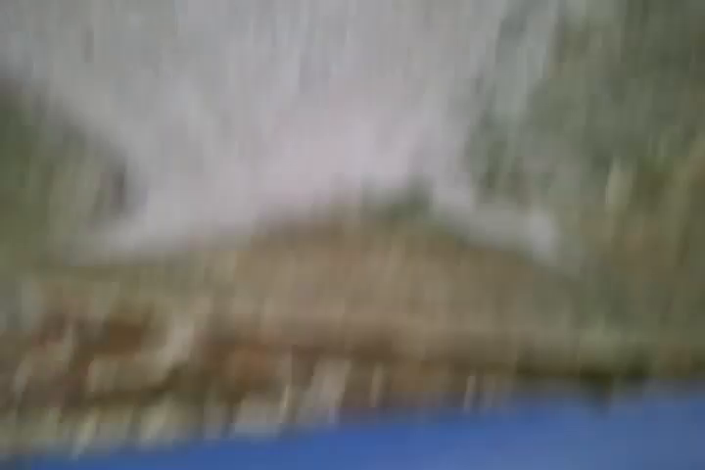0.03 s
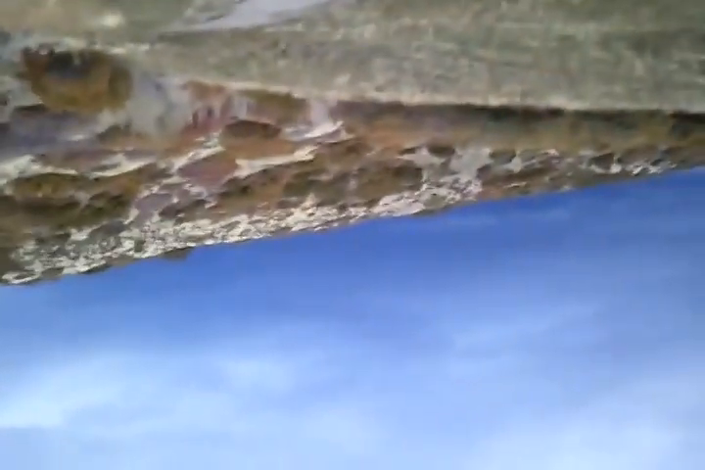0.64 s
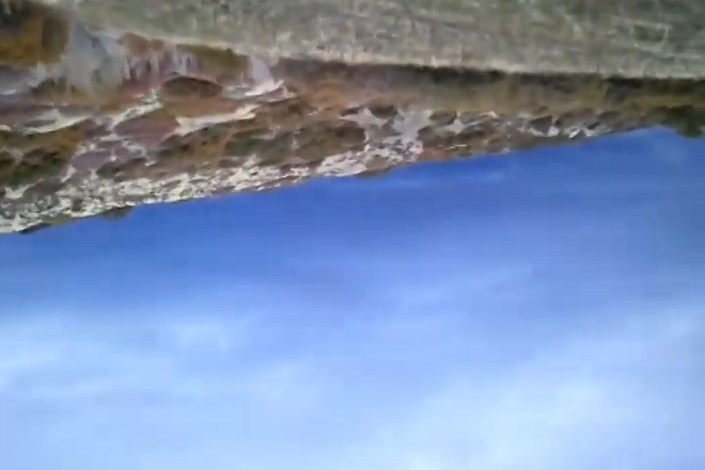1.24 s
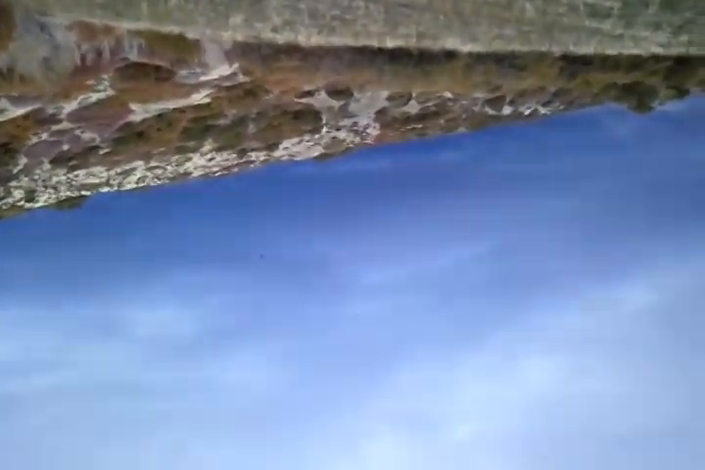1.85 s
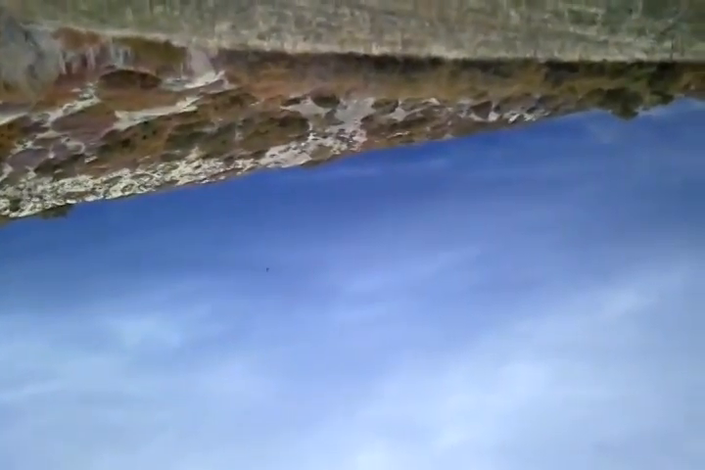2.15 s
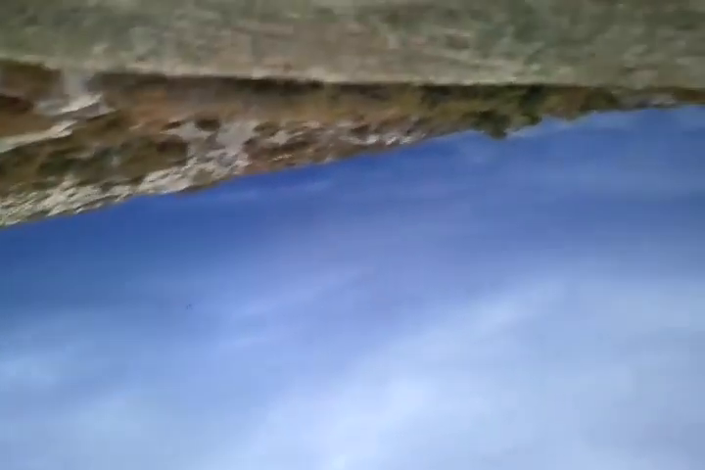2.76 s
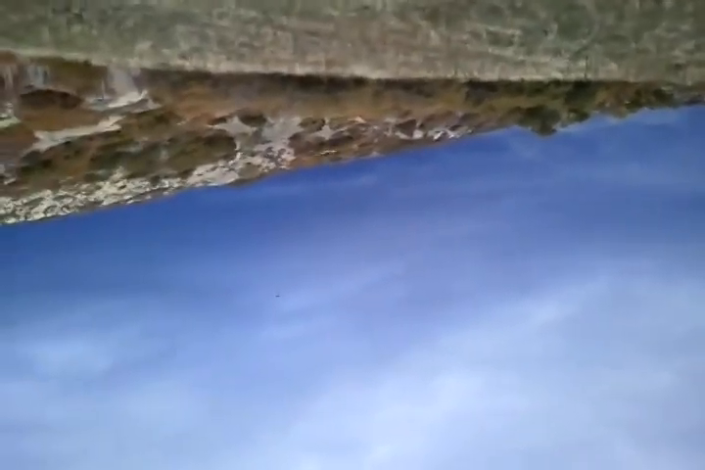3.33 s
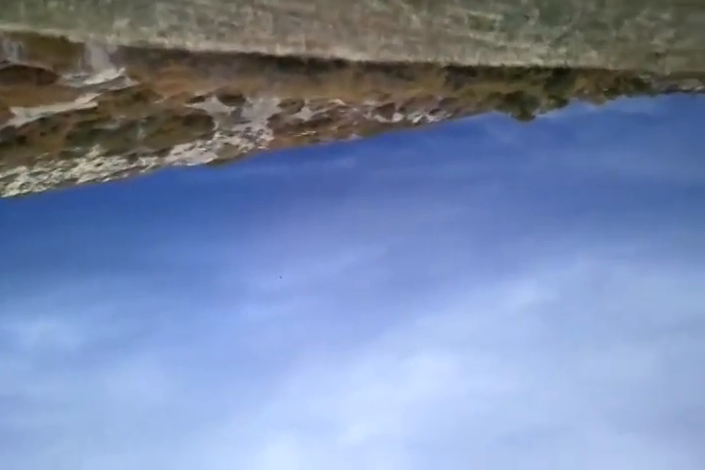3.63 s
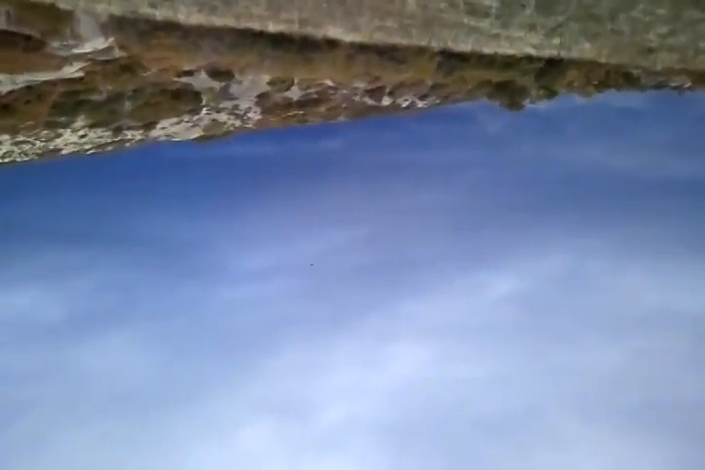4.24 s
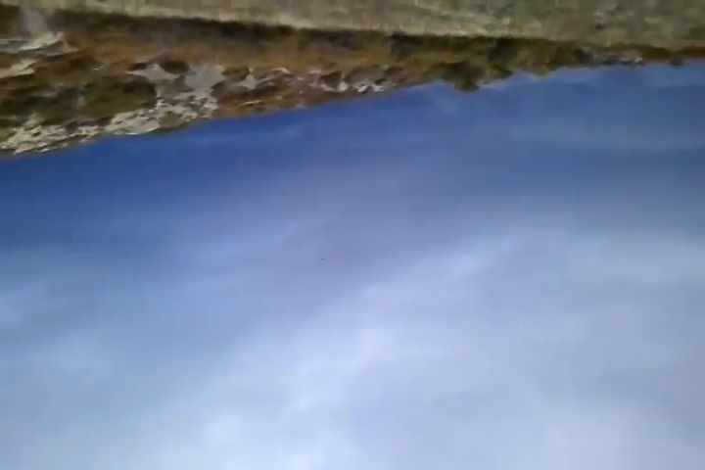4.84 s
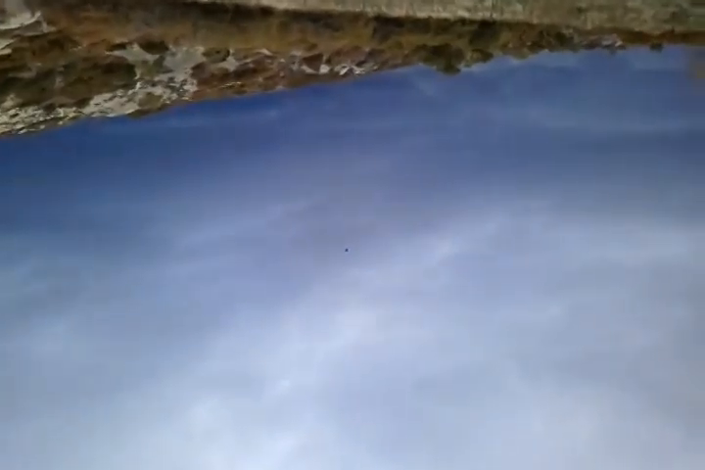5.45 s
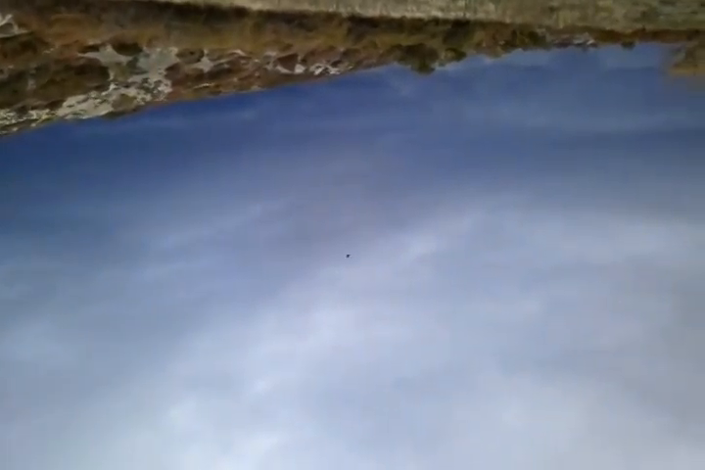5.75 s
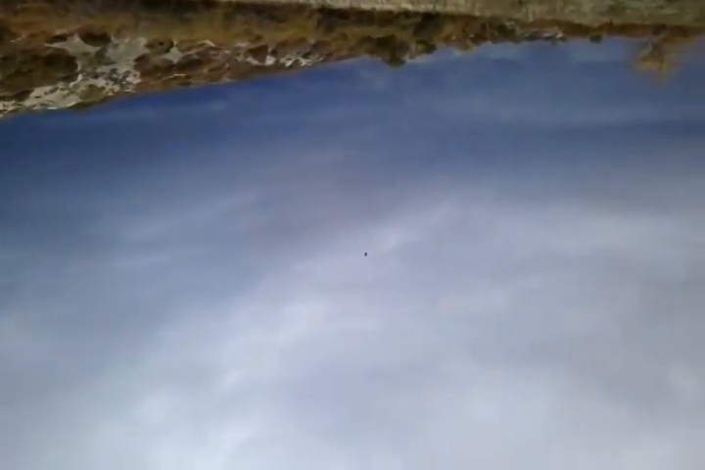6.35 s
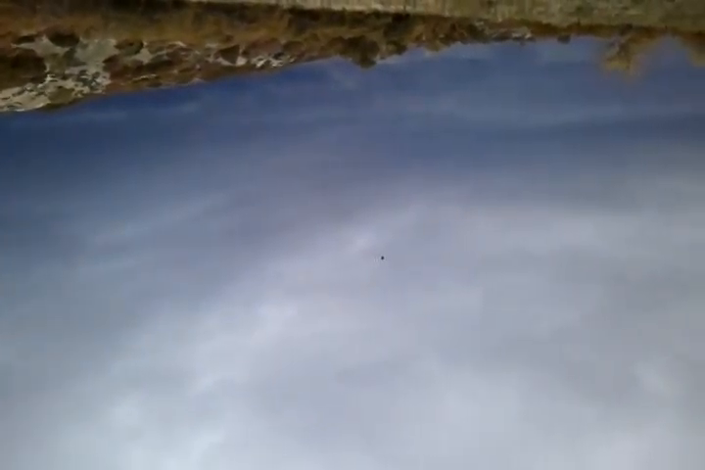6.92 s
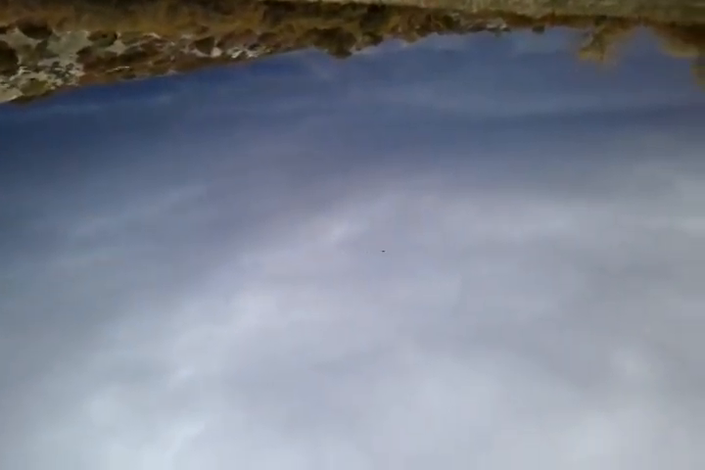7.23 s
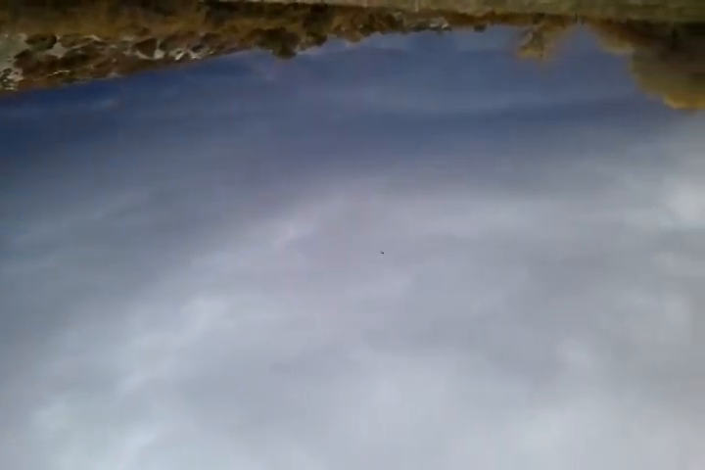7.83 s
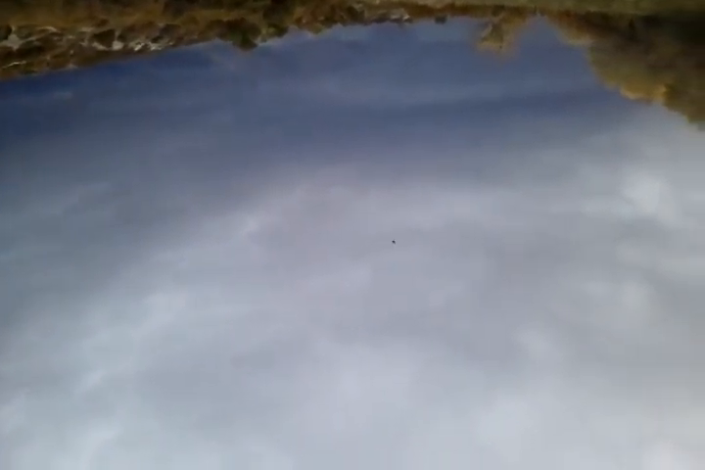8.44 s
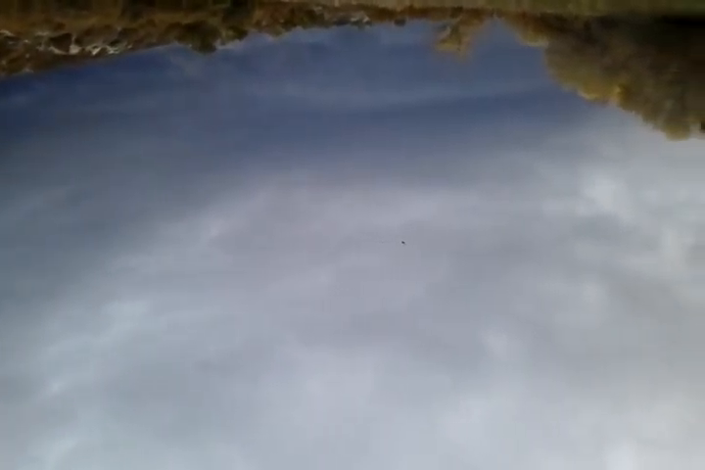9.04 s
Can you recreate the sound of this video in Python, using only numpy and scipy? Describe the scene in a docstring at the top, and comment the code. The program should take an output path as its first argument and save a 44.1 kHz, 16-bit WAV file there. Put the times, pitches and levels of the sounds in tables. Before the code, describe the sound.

After a brief silence, a soft hillside breeze comes in at about 0.7 seconds and continues throughout. Cloth and dry grass rustle close to the hand-held microphone, with small crunches and snaps. Two faint, hoarse bird cries carry from far off at about 1.6 and 3.1 seconds. The crunching peaks around 3 seconds with the loudest, sharpest snaps and two tiny metal clinks, the second much weaker. From about 3.6 to 5 seconds fingers bump the camera case and shift their grip with dull knocks and crackle. The rustle dies away by 6 seconds, leaving the breeze. At 6.8 seconds a hawk screams once, high overhead: a harsh rising attack, then a long, wavering, sinking whistle that cracks into rasp. It fades by about 8.5 seconds with a thin echo from the slopes.

```python
"""A breeze blows over a hillside. Cloth and dry grass rustle, crunch and snap close to a hand-held camera.
Two faint cries carry from far off; between them a small metal fitting clinks twice.
Fingers bump the case and shift their grip, then the rustle dies away.
At 6.8 s a hawk screams once, high overhead: a harsh rising attack, then a long wavering, sinking
whistle, cracking into rasp where its syrinx vibrates chaotically. The slopes scatter a thin tail."""
import sys
import numpy as np
from scipy import signal
from scipy.fft import rfft, irfft, next_fast_len
from scipy.io import wavfile
from scipy.ndimage import map_coordinates

SR = 44100
rng = np.random.default_rng(int(sys.argv[2]) if len(sys.argv) > 2 else 0)


def pcm_store(signal):
    """Save signal as 16-bit PCM."""
    levels = np.round(np.clip(np.atleast_2d(signal), -1, 1) * 32767)
    wavfile.write(sys.argv[1], SR, levels.astype(np.int16).T)


N = 404838

# wind spectrum: f/Hz, density/dB
WIND_SPECTRUM = [(18, -39), (30, -14.5), (75, -8.5), (108, -8.5), (181, -4), (240, -1.5), (704, -2.5),
                 (910, -2.5), (1070, -4.5), (1390, -6), (2370, -11.5), (2860, -11.5), (3610, -13.5),
                 (7460, -13), (8000, -17.5), (10400, -64), (17600, -120)]
# distant cries: start/s, length/s, level/dB
DISTANT_CRIES = [(1.562, 0.38, -57.5), (3.131, 0.39, -60)]
# cloth and grass rubbing: t/s, level/dB
RUB_LEVEL = [(0.91, -54), (1.4, -52), (1.7, -47.5), (2.2, -54.5), (2.3, -50), (2.5, -47.5), (2.76, -37.5),
             (2.85, -45), (3.0, -45), (3.15, -42), (3.45, -48.5), (3.64, -58), (3.83, -45), (4.25, -50.5),
             (4.9, -50), (5.35, -60), (5.75, -57.5), (6.2, -66)]
# rubbing spectrum: f/Hz, density/dB
RUB_SPECTRUM = [(24, -44), (40, -30.5), (142, -7), (189, -15.5), (479, 1.5), (714, -4.5), (1160, -3),
                (1660, -2), (1980, -3.5), (2160, -2.5), (5250, -1), (7000, 6), (8000, 3.5), (10400, -81.5),
                (17600, -120)]
# crunching scrapes: crest t/s, level/dB, decay/s
SCRAPE_EVENTS = [(0.758, -36, 0.0048), (1.175, -41.5, .014), (1.423, -39, 0.0088), (2.349, -36, .014),
                 (2.703, -30.5, 0.066), (2.878, -27.5, 0.016), (2.918, -30.5, 0.014), (2.936, -19.5, 0.005),
                 (2.951, -23.5, 0.021), (3.007, -22.5, 0.003), (3.035, -23.5, 0.0026), (3.657, -37, .005),
                 (3.674, -33.5, .014), (3.718, -37.5, 0.0066), (3.797, -41, .0075), (3.846, -32.5, 0.023),
                 (4.539, -42, 0.03), (4.707, -39.5, 0.0072), (4.981, -39.5, 0.0056), (5.014, -42, .005)]
# scrape spectrum: f/Hz, density/dB
SCRAPE_SPECTRUM = [(30, -10), (300, -11), (1500, -9.5), (3000, -8), (5000, -3), (7500, 5), (8500, -9),
                   (10000, -38.5)]
# dry snaps: t/s, level/dB, centre f/Hz
SNAP_EVENTS = [(1.4214, -24.5, 5000), (1.469, -23.5, 2700), (1.784, -28.5, 6000), (2.016, -28, 6500),
               (2.241, -40, 5500), (2.735, -22, 6000), (2.862, -23, 5500), (2.9505, -12, 6500),
               (3.0247, -4.5, 4300), (3.0342, -14, 6500), (3.7966, -20.5, 6000), (3.804, -22, 5600),
               (4.146, -32, 6500), (4.463, -24, 5500), (5.016, -29, 6500)]
# fingers shifting grip: t/s, level/dB
GRIP_LEVEL = [(3.6, -63), (3.66, -46.5), (3.9, -46), (4.1, -54.5), (4.5, -54), (4.8, -55), (5.15, -59),
              (5.3, -77)]
# finger bumps on the case: t/s, level/dB, f/Hz
BUMP_EVENTS = [(1.222, -35, 996), (1.421, -32.5, 956), (3.108, -31, 646), (3.207, -31, 1400),
               (3.642, -28, 495), (3.654, -22, 514), (3.666, -14, 785), (3.675, -24, 980),
               (3.682, -27, 410), (3.691, -24, 430), (3.714, -29, 1040), (3.78, -34.5, 960),
               (3.836, -25.5, 690), (3.894, -28.5, 1140), (4.033, -22, 880), (4.41, -30.5, 1440),
               (4.44, -33.5, 1340), (4.461, -33.5, 1570), (4.533, -33, 1250), (4.713, -28.5, 610),
               (5.102, -34.5, 940)]
# touches of the metal fitting: t/s, level/dB
CLINK_EVENTS = [(2.954, -29), (3.031, -45)]
# modes of the fitting: f/Hz, level/dB, t60/s
METAL_MODES = [(1370, 2.5, 0.085), (4720, -5, 0.14), (6170, -2, 0.061), (6280, 0, 0.18), (6550, -7, .14),
               (7660, 2, 0.11), (8400, -4, .14)]
# scream contour: t/s, f/Hz, level/dB, roughness
SCREAM = [(6.775, 2340, -53, 0.66), (6.818, 2630, -36.5, 0.64), (6.85, 3040, -35.5, 0.35),
          (6.895, 3105, -35, 0), (6.91, 3300, -40.5, 1.1), (6.975, 2697, -44, 0.74),
          (7.09, 2520, -43, 0.38), (7.21, 2449, -46, 0.43), (7.38, 2513, -46, 0.4), (7.47, 2360, -48, .4),
          (7.6, 2370, -43.5, .17), (7.7, 2316, -48.5, 0.37), (7.84, 2340, -48, 0.43),
          (7.915, 2340, -44.5, 0.02), (7.99, 2198, -52.5, .36), (8.27, 2140, -52.5, .3),
          (8.45, 2090, -70, 0.7)]
# cracks from whistle into rasp: centre t/s, half-length/s, loss/dB
VOICE_CRACKS = [(7.143, 0.036, 2.5), (7.293, .012, 2), (7.411, .014, 3.5), (7.521, 0.017, 5),
                (7.75, 0.039, 2.5), (7.955, 0.027, 5), (8.088, .024, 8), (8.205, .028, 9), (8.31, .02, 8)]
# period doubling of the syrinx: start/s, end/s, half-pitch level/dB re main line
PERIOD_DOUBLINGS = [(7.03, 7.13, -12), (7.194, 7.423, -11), (7.976, 8.084, -6.5)]
# throat rasp, beak wide: f/Hz, density/dB
RASP_OPEN = [(1500, -35), (2300, -20), (2800, 0.5), (3500, 0.5), (4100, -3.5), (4700, -8), (5300, -5),
             (6200, -19), (7000, -5.5), (8000, -19)]
# throat rasp, beak nearly closed: f/Hz, density/dB
RASP_CLOSED = [(1000, -29.5), (1700, 1), (2000, -4.5), (2900, 7.5), (3600, -4), (4300, -9), (5300, -12),
               (6000, -13), (8000, -25)]


def amp(db):
    return 10 ** (np.asarray(db) / 20)


def unit_rms(x):
    return x / np.sqrt(np.mean(x ** 2) + 1e-20)


def clock():
    return np.arange(N) / SR


def curves(rows):
    """Each column after t, interpolated per sample."""
    times, *columns = np.transpose(rows)
    return [np.interp(clock(), times, column) for column in columns]


def during(rows, fade_s):
    """Gate over a table's time span."""
    return np.clip(np.minimum(clock() - rows[0][0], rows[-1][0] - clock()) / fade_s, 0, 1)


def plateau(centre_s, half_s):
    """Flat-topped window, soft shoulders."""
    return 1 / (1 + ((clock() - centre_s) / half_s) ** 6)


def wobble(rate_hz):
    """Smooth random curve, knots at rate_hz."""
    knots = rng.standard_normal(int(N * rate_hz / SR) + 4)
    return map_coordinates(knots, [np.arange(N) * rate_hz / SR])


def fuzz(phase, rate_hz):
    """Noise band around a carrier, rms 1."""
    return unit_rms(wobble(rate_hz) * np.sin(phase) + wobble(rate_hz) * np.cos(phase))


def filtered(x, response):
    size = next_fast_len(N + SR // 2)
    return irfft(rfft(x, size) * response(np.fft.rfftfreq(size, 1 / SR)), size)[:N]


def coloured(x, spectrum):
    """x shaped by a spectrum table, rms 1."""
    knots_hz, db = np.transpose(spectrum)
    return unit_rms(filtered(x, lambda hz: amp(np.interp(np.log(hz + 1), np.log(knots_hz + 1), db))))


def resonant(x, hz, q):
    return signal.lfilter(*signal.iirpeak(hz, q, SR), x)


def resonant_twice(x, hz, q):
    return resonant(resonant(x, hz, q), hz, q)


def noise_band(hz, q, samples=N):
    return unit_rms(resonant_twice(rng.standard_normal(samples), hz, q))


def highpass(x, hz):
    return signal.sosfilt(signal.butter(2, hz, "high", fs=SR, output="sos"), x)


def add(track, start_s, sound):
    part = track[round(start_s * SR):][:len(sound)]
    part += sound[:len(part)]


def grains(rate_hz, spread_db):
    """Tiny random slips, a few far stronger than the rest."""
    size = amp(spread_db * np.minimum(rng.exponential(size=N), 4))
    return unit_rms((rng.random(N) < rate_hz / SR) * size * rng.choice([-1, 1], N))


def hillside(x, t60_s=1.0, wet_db=-12):
    """Rocks and slopes scatter a thin tail."""
    t = np.arange(SR) / SR
    tail = rng.standard_normal(SR) * amp(-60 * t / t60_s) * (1 - np.exp(-t / .01))
    return x + amp(wet_db) * signal.fftconvolve(x, tail / np.linalg.norm(tail))[:N]


def wind(breeze_db=-53, gust_db=2.5, gust_s=3.25, gust_width_s=0.43, hum_db=-69):
    """Air rushes over the slope: one broad swell, faint low hum."""
    level_db = breeze_db + gust_db * np.exp(-((clock() - gust_s) / gust_width_s) ** 2)
    rush = amp(level_db + 0.5 * wobble(6.8)) * coloured(rng.standard_normal(N), WIND_SPECTRUM)
    hum = amp(hum_db) * noise_band(hz=84.7, q=3)
    pickup_db = np.interp(clock(), [.8, .95], [-4, 0])
    return (rush + hum) * amp(pickup_db)


def far_cries(top_hz=3400, scoop_hz=598, scoop_s=.06, jitter=0.025):
    """Distance leaves a hoarse, blurred whistle; each scoops up to pitch."""
    out = np.zeros(N)
    for start_s, length_s, db in DISTANT_CRIES:
        pitch_hz = top_hz - scoop_hz * np.exp(-np.maximum(clock() - start_s, 0) / scoop_s)
        phase = 2 * np.pi * np.cumsum(pitch_hz * (1 + jitter * wobble(500))) / SR
        out += amp(db) * plateau(start_s + length_s / 2, length_s / 2) * fuzz(phase, 450)
    return out


def rustle(grain_share=0.77):
    """Cloth and dry grass slide in dense fibre slips."""
    level_db, = curves(RUB_LEVEL)
    slips = np.sqrt(grain_share) * grains(rate_hz=4000, spread_db=4.75)
    slips += np.sqrt(1 - grain_share) * rng.standard_normal(N)
    return amp(level_db + 1.67 * wobble(60)) * during(RUB_LEVEL, 0.005) * coloured(slips, RUB_SPECTRUM)


def scrapes(rise_s=0.004):
    """Fibre slips thicken into short crunches."""
    t, pressure = clock(), np.zeros(N)
    for crest_s, db, decay_s in SCRAPE_EVENTS:
        falloff = np.maximum((crest_s - t) / rise_s, (t - crest_s) / decay_s)
        pressure += amp(db) * np.exp(-falloff.clip(0, 30))
    return pressure * coloured(grains(rate_hz=9000, spread_db=2.7), SCRAPE_SPECTRUM)


def snaps(t60_s=0.0087, splinter=0.33):
    """One sharp crack each, with a brief splintering tail."""
    out, t = np.zeros(N), np.arange(SR // 20) / SR
    for start_s, db, hz in SNAP_EVENTS:
        crack = splinter * rng.standard_normal(len(t)) * amp(-60 * t / t60_s)
        crack[0] = 1
        crack = resonant(crack, hz, q=0.76)
        add(out, start_s, amp(db) * crack / np.abs(crack).max())
    return highpass(out, hz=1100)


def grip(gain_db=-2, case_hz=1100):
    """Skin sticks and slips on the case: dull, irregular crackle."""
    level_db, = curves(GRIP_LEVEL)
    crackle = unit_rms(resonant_twice(grains(rate_hz=260, spread_db=4.4), case_hz, q=1))
    return amp(level_db + gain_db) * during(GRIP_LEVEL, .02) * crackle


def bumps(damping_db_per_s=120 / 0.0061, rattle_gain=0.26, rattle_t60_s=0.054, delay_s=0.001025):
    """Fingertips hit the case: damped pop, short rattle."""
    out, t = np.zeros(N), np.arange(SR // 12) / SR
    for start_s, db, hz in BUMP_EVENTS:
        pop = np.sin(2 * np.pi * hz * t) * t * amp(-damping_db_per_s * t)
        rattle = rattle_gain * noise_band(hz, q=1, samples=len(t)) * amp(-60 * t / rattle_t60_s)
        add(out, start_s + delay_s, amp(db) * (pop / np.abs(pop).max() + rattle))
    return highpass(out, hz=230)  # a small case radiates little bass


def clinks(spread_db=2):
    """The fitting's modes ring at new strengths on each touch."""
    out, t = np.zeros(N), np.arange(SR // 4) / SR
    for start_s, db in CLINK_EVENTS:
        for hz, mode_db, t60_s in METAL_MODES:
            level_db = db + mode_db + rng.normal(0, spread_db) - 60 * t / t60_s
            add(out, start_s, amp(level_db) * np.sin(2 * np.pi * hz * t))
    return out


def syrinx(waver_start_s=7.03, waver_hz=8.1, depth_hz=124.6, fade_s=0.59, crack_rough=0.9):
    """Pitch, effort and roughness of the scream: contour, dying waver, cracks."""
    pitch_hz, effort_db, rough = curves(SCREAM)
    age_s = np.maximum(clock() - waver_start_s, 0)
    pitch_hz -= depth_hz * np.exp(-age_s / fade_s) * np.sin(2 * np.pi * waver_hz * age_s)
    for centre_s, half_s, loss_db in VOICE_CRACKS:
        crack = plateau(centre_s, half_s)
        rough += (crack_rough - rough) * crack
        effort_db -= loss_db * crack
    return pitch_hz, effort_db, np.clip(rough, .02, .95)


def period_doubling(phase, rest_db=-26, upper_start_db=-22, upper_db_per_s=8):
    """Half-pitch line in bursts; a line near 1.5 x pitch grows as the cry tires."""
    half_db = rest_db + sum((db - rest_db) * plateau((start_s + end_s) / 2, (end_s - start_s) / 2)
                            for start_s, end_s, db in PERIOD_DOUBLINGS)
    upper_db = upper_start_db + upper_db_per_s * (clock() - SCREAM[0][0])
    half = amp(half_db + 3.5 * wobble(35)) * np.sin(phase / 2 + .4 * wobble(200))
    upper = amp(upper_db + 3 * wobble(35)) * np.sin(1.485 * phase + .8 * wobble(350))
    return half + upper


def throat_rasp(rough, gape_s=6.92, open_db_per_s=67, close_db_per_s=48, closed_db=-9):
    """Throat noise, brighter as the beak gapes at the top of the attack."""
    t = clock()
    closure_db = np.maximum(open_db_per_s * (gape_s - t), close_db_per_s * (t - gape_s))
    gape_db = np.maximum(-2.5 - closure_db, -18)
    rasp = coloured(rng.standard_normal(N), RASP_OPEN) * amp(gape_db)
    rasp += coloured(rng.standard_normal(N), RASP_CLOSED) * amp(closed_db) * np.sqrt(rough)
    return rasp * amp(1.7 * wobble(300))


def hawk(jitter=0.0349, flutter_db=2, chaos=0.64, octave_db=-11, hiss_db=-21, stutter_db=2):
    """A whistling syrinx slips in and out of chaotic, rasping vibration."""
    pitch_hz, effort_db, rough = syrinx()
    detune = rough * (jitter * wobble(700) + .024 * wobble(110))
    phase = 2 * np.pi * np.cumsum(pitch_hz * (1 + detune)) / SR
    # chaos trades the clean line for a noise band
    whistle = np.sqrt(2 * (1 - rough)) * np.sin(phase)
    chaotic = chaos * np.sqrt(rough) * fuzz(phase, 650)
    whistle *= amp(-flutter_db * np.sqrt(rough) * wobble(300))
    doubled = period_doubling(phase)
    # the high attack lifts the octave into the throat's upper resonance
    octave = amp(octave_db) * resonant_twice(np.sin(2 * phase + 0.77 * wobble(900)), hz=6100, q=3.7)
    hiss = noise_band(hz=5350, q=9) * amp(hiss_db + 3 * wobble(45))  # turbulence
    voice = whistle + chaotic + np.sqrt(2) * (doubled + octave) + hiss + throat_rasp(rough)
    return amp(effort_db + stutter_db * np.sqrt(rough) * wobble(75)) * during(SCREAM, 0.012) * voice


def scene():
    cries = hillside(hawk() + far_cries())
    return (cries + rustle() + scrapes() + snaps() + bumps() + grip() + clinks() + wind())[None]


def record(dry, start_s=.742, fade_s=0.011, cutoff_hz=8150):
    """Silence until start_s; steep low-pass."""
    gate = np.clip((clock() - start_s) / fade_s, 0, 1)
    return filtered(dry[0] * gate, lambda hz: 1 / np.sqrt(1 + (hz / cutoff_hz) ** 90))[None]


dry = scene()
out = record(dry)
pcm_store(out)
```